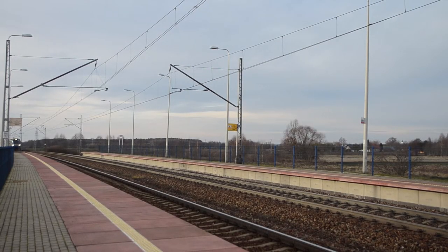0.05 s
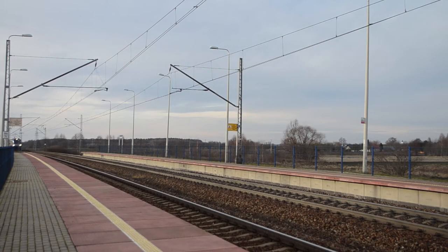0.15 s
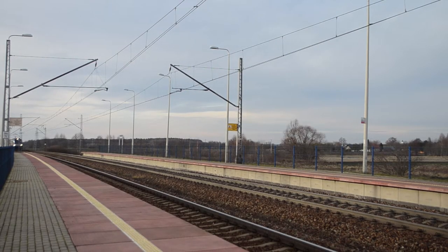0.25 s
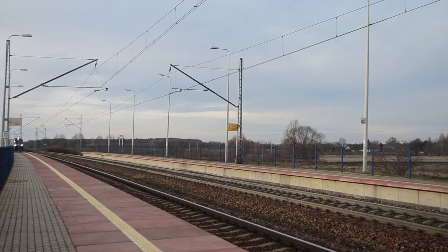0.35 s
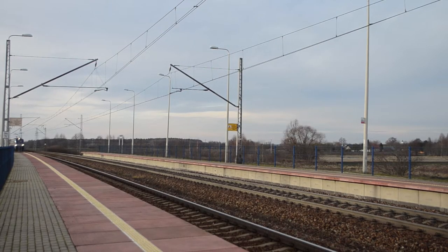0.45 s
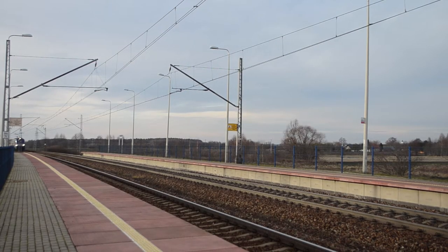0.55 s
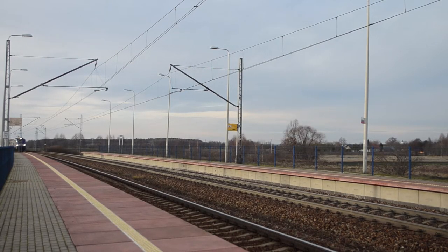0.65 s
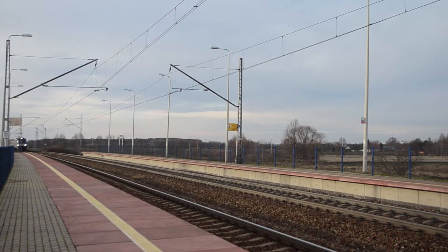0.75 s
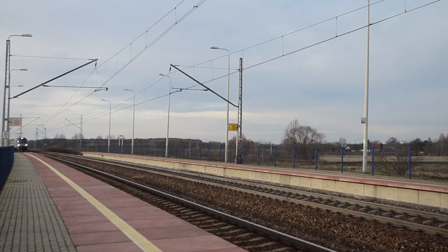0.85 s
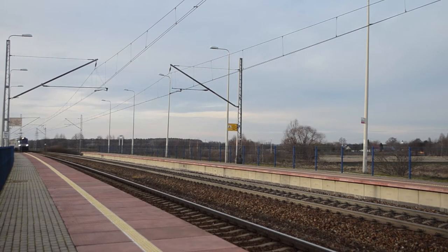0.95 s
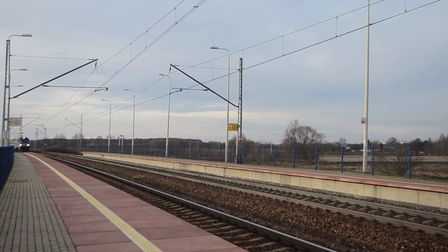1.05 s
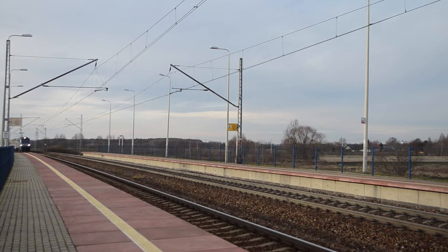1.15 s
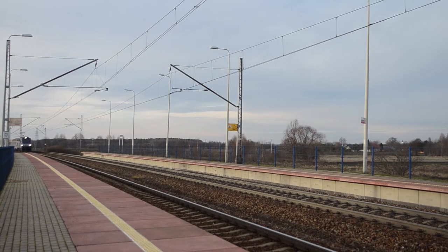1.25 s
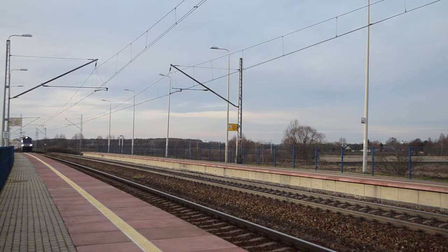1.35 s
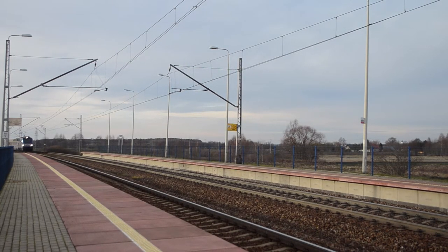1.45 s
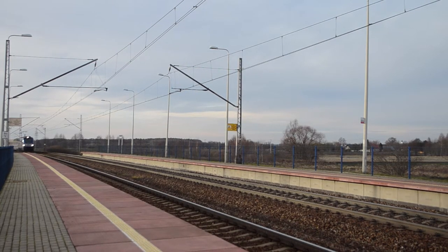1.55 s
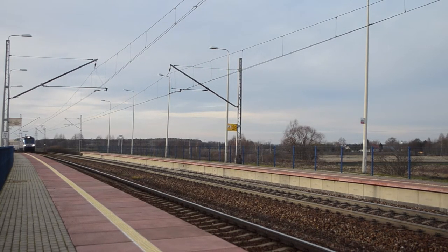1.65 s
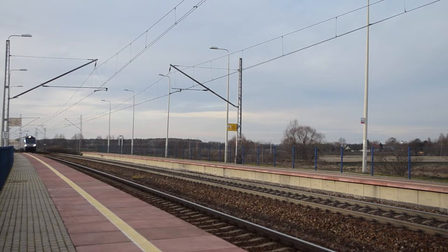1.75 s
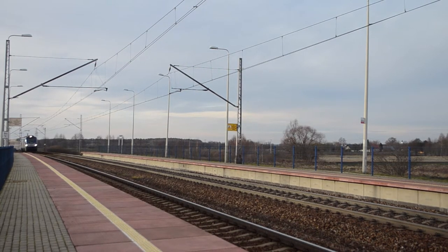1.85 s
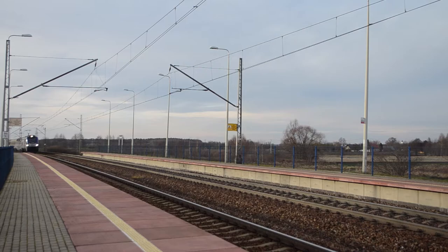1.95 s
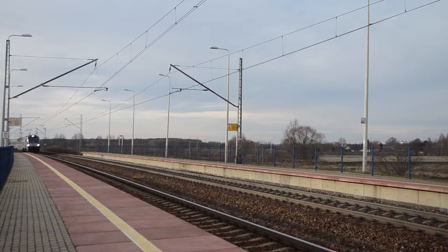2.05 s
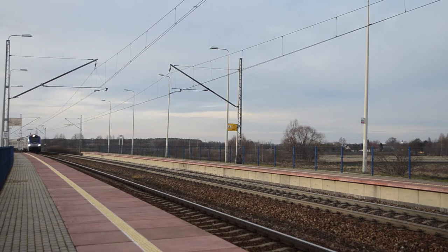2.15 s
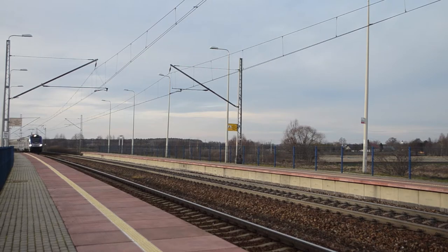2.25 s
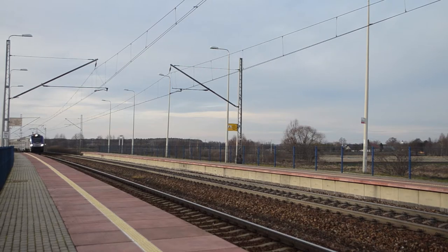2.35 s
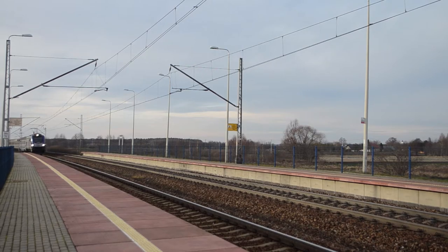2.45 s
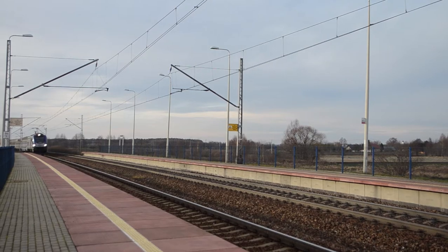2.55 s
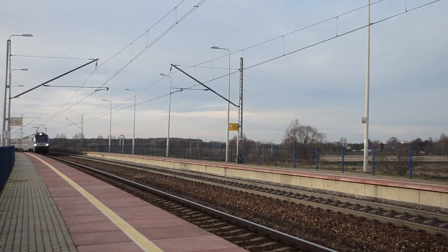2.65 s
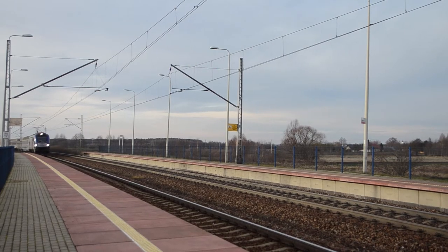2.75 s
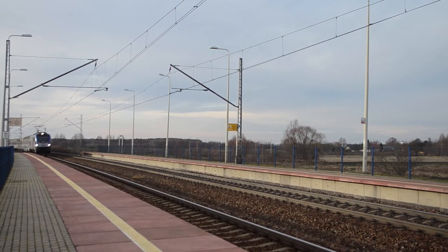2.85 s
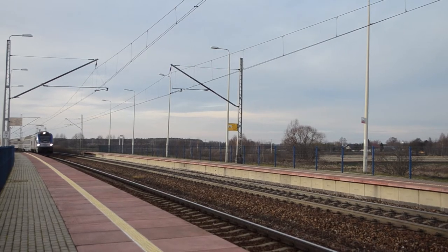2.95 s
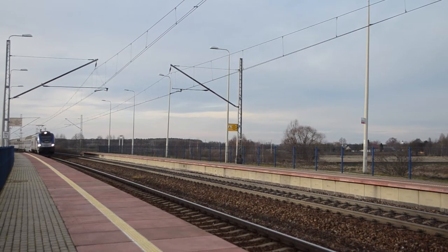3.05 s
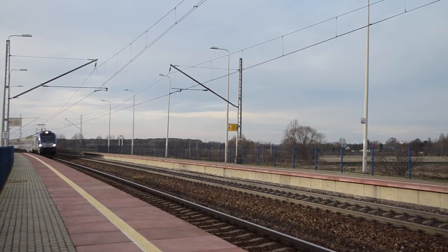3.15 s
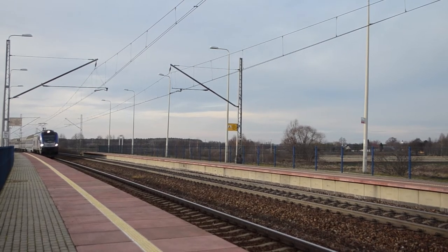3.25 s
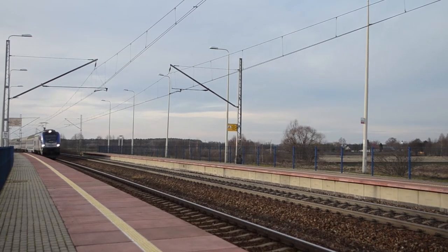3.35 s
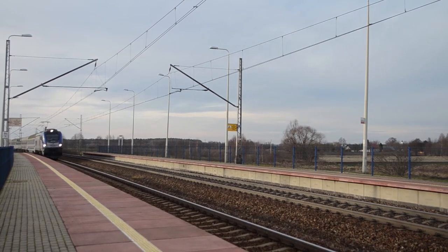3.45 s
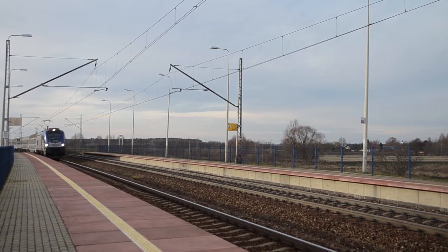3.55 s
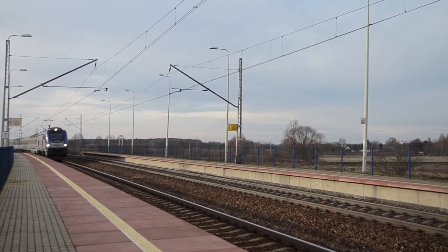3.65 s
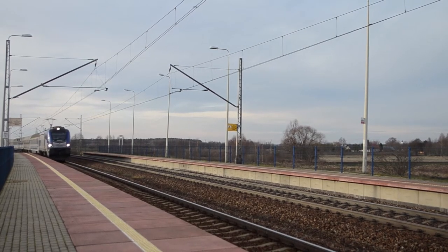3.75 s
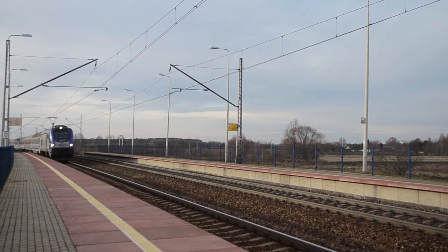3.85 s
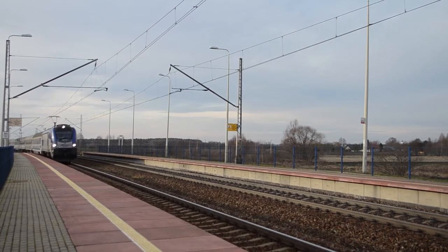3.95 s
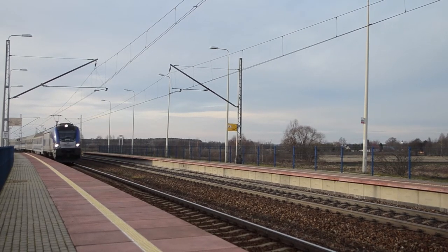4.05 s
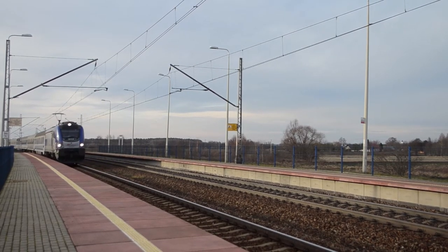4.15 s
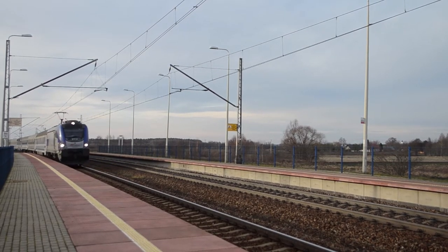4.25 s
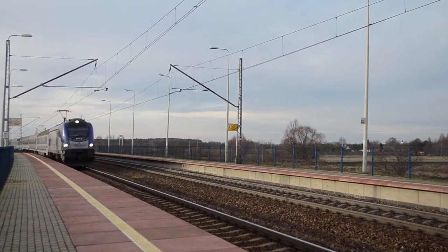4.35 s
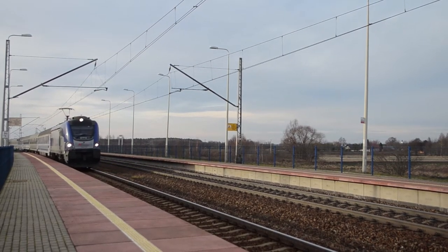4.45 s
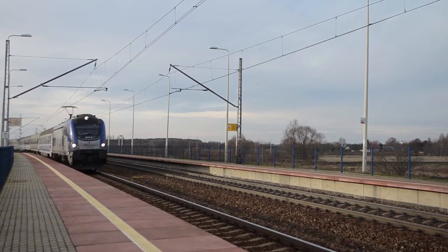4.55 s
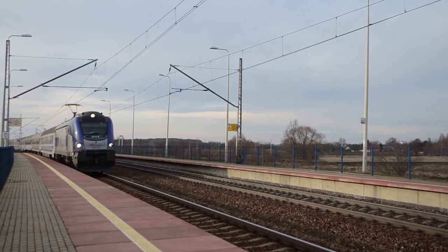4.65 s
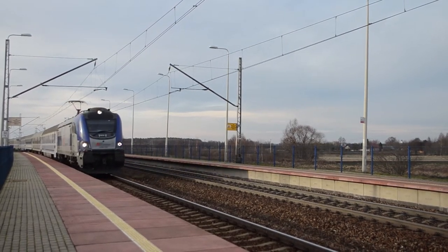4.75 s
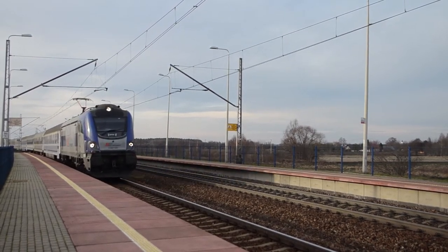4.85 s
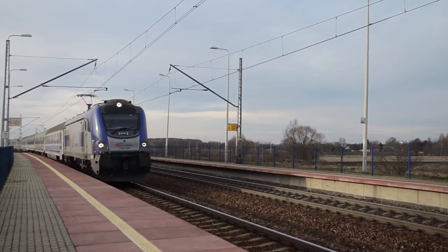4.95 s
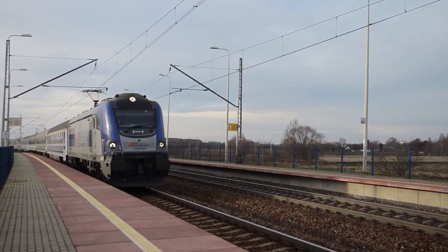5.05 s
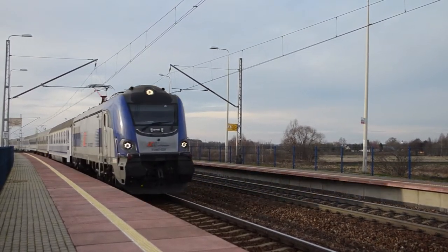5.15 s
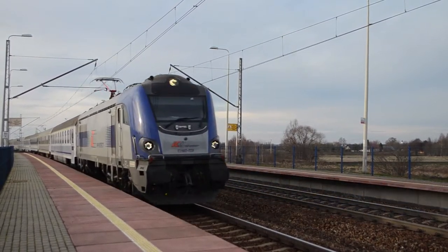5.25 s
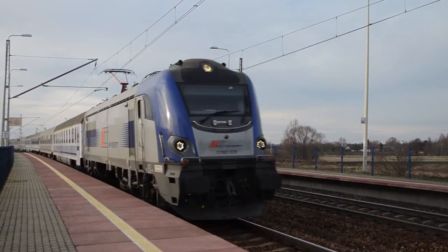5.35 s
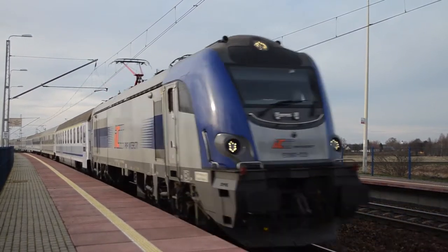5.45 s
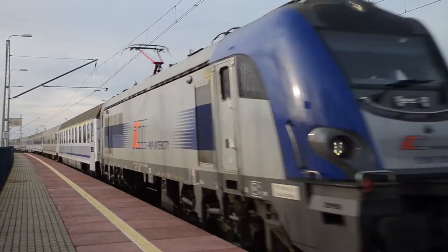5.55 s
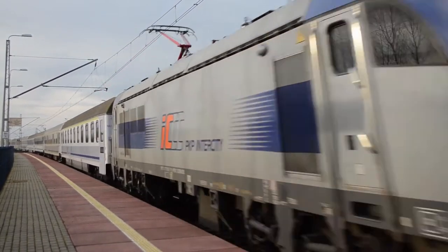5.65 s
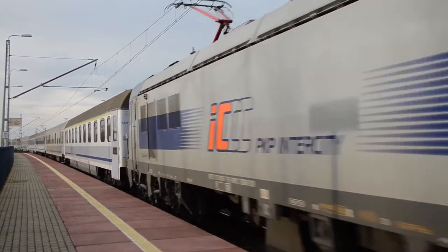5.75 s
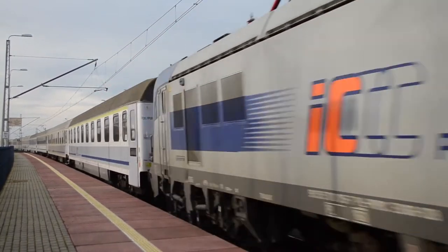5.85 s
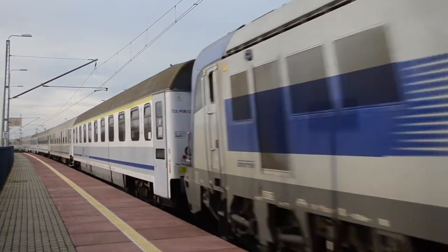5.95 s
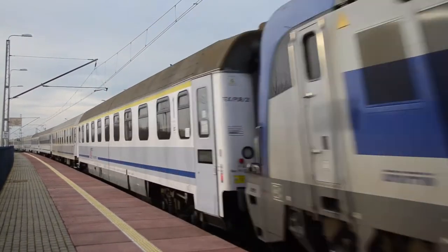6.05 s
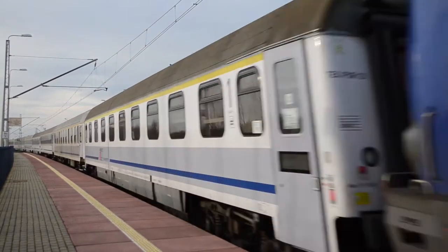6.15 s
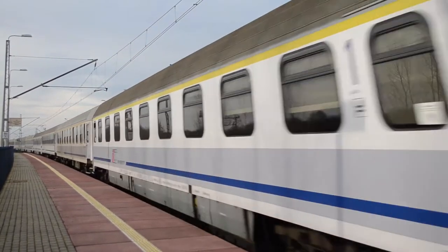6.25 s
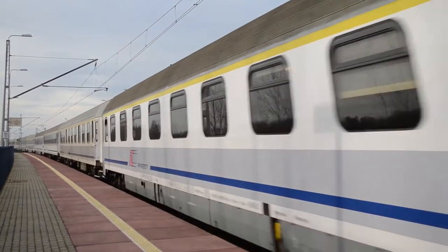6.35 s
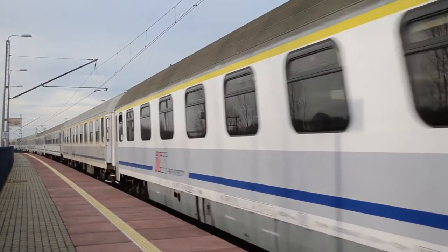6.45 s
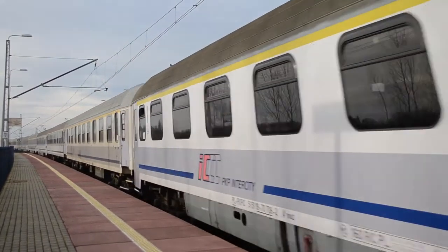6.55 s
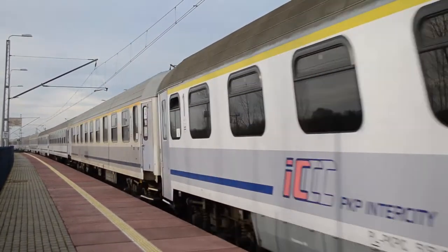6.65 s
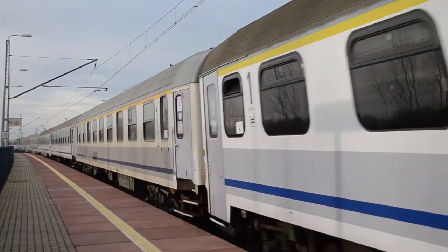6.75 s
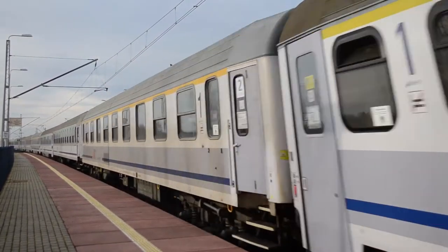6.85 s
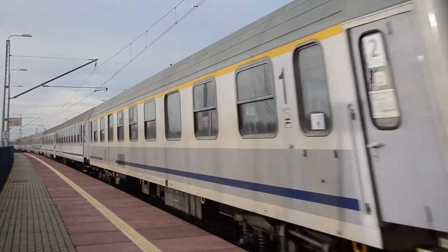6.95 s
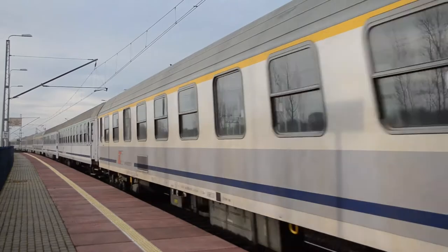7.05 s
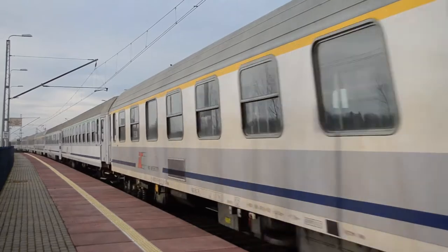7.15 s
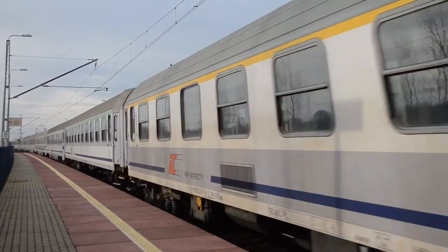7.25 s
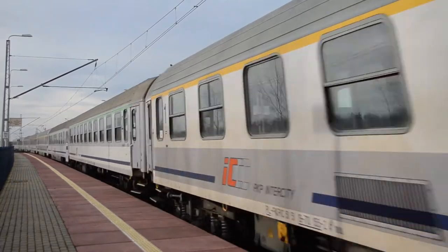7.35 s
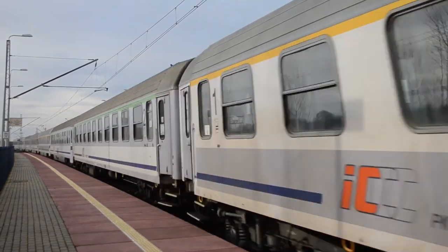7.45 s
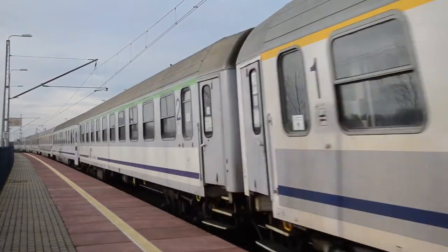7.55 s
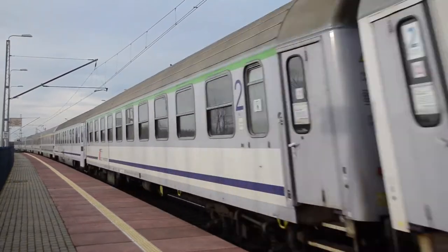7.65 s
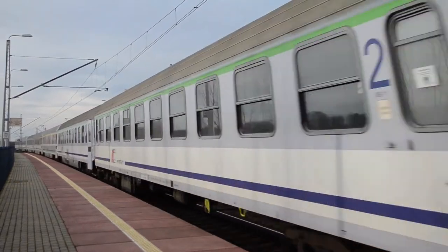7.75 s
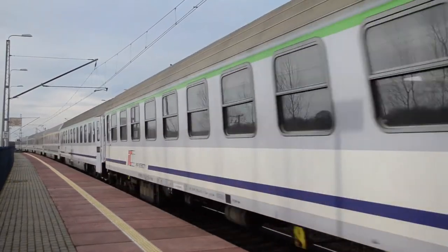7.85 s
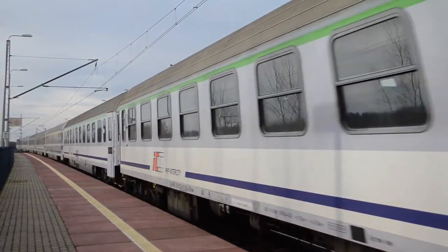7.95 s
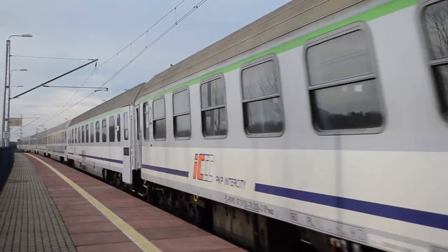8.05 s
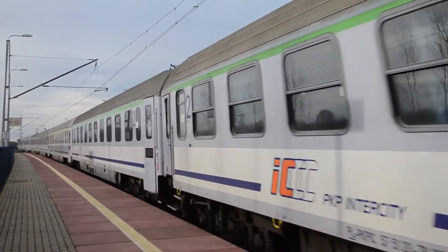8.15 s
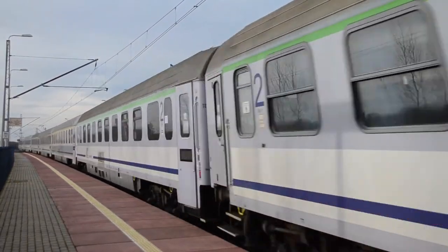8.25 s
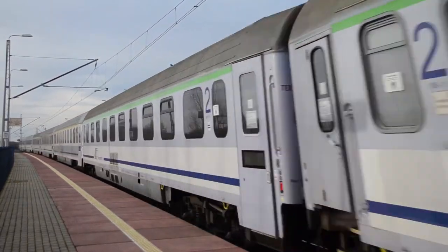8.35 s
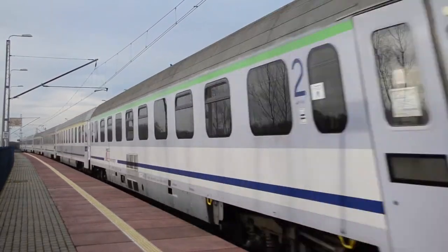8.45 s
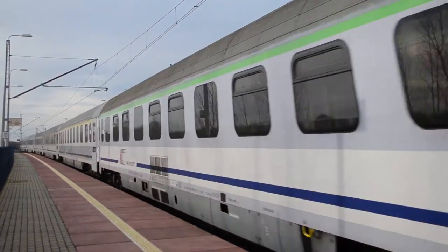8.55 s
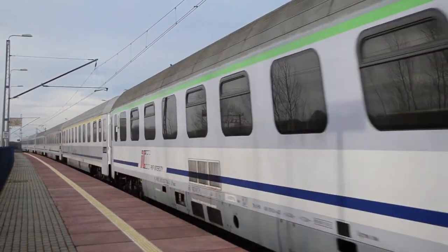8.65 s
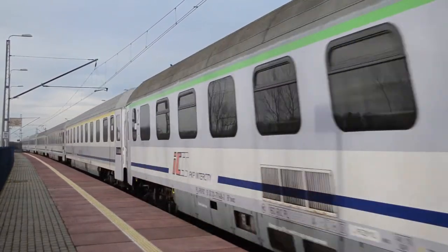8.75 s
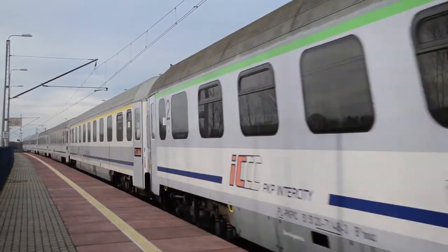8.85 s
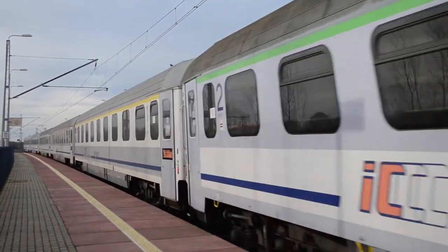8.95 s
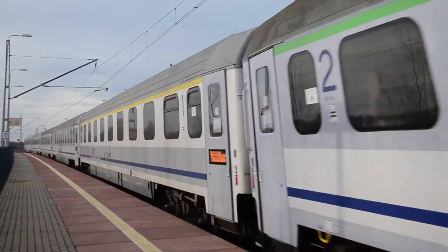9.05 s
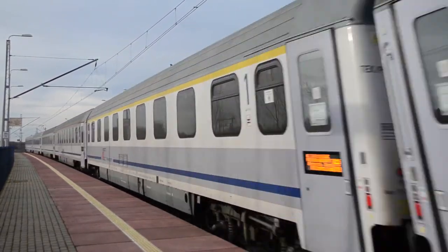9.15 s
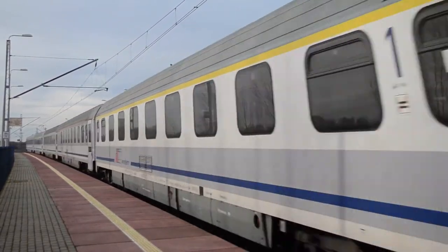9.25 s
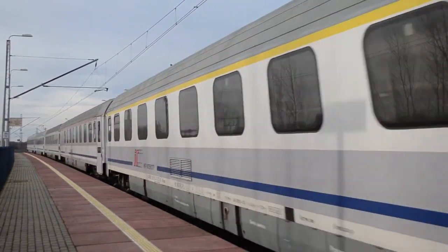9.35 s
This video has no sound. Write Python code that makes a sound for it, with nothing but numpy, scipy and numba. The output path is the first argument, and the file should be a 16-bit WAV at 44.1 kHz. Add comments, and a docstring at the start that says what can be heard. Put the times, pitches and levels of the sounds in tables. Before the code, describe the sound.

Open-air platform with a soft, steady wash of far roads. Thin, high metallic rail singing slowly grows ahead of a train. Around five seconds the sound surges; an electric locomotive roars past close to the microphone, humming and whining tones sliding down in pitch. Carriages follow in loud, quick pulses of rolling noise, gritty rush and falling wheel whines, still passing at the end.

```python
"""An electric express streams past a camera on an open platform, over a steady wash from far roads.
At first the rails sing ahead of it, as noise rung in clusters of high modes.
The locomotive then rumbles by, its drive tones falling in pitch by the Doppler effect.
Bogie after bogie follows with a falling whine, over shaped noise for rush, rumble, rolling and hiss.
The camera's limiter holds the loudest part down."""
import sys
import numpy as np
from scipy import signal
from scipy.fft import rfft, irfft, next_fast_len
from scipy.io import wavfile
from scipy.ndimage import uniform_filter1d, minimum_filter1d
from numba import njit

SR = 44100
rng = np.random.default_rng(int(sys.argv[2]) if len(sys.argv) > 2 else 0)


def wrap_up_sound(samples):
    """Save the sound to the file named by the first command line argument, as 16-bit audio."""
    columns = np.atleast_2d(samples).T
    # keep every value between -1 and 1, then stretch to whole-number steps
    tamed = np.clip(columns, -1, 1)
    steps = np.round(tamed * 32767).astype(np.int16)
    wavfile.write(sys.argv[1], SR, steps)


N = 414099

SPEED_M_S, SOUND_M_S = 35.7, 343
TRACK_M = 8.2  # closest distance of a source from the camera


def undb(db):
    """Amplitude ratio: 20 dB is a factor of ten."""
    return 10 ** (np.asarray(db) / 20)


def unit(x):
    """Normalisation to an rms of 1."""
    return x / np.sqrt(np.mean(x ** 2))


def columns(table):
    """Linear interpolation of each column against the first, time in seconds."""
    time_s, *rest = np.transpose(table)
    return [np.interp(np.arange(N) / SR, time_s, column) for column in rest]


def coloured(x, shape):
    """Spectral shaping: weights x by dB points joined over log frequency; rms 1."""
    hz, db = np.transpose(shape)
    size = next_fast_len(N)
    bins_hz = np.arange(size // 2 + 1) * SR / size + 1  # 1 Hz up, to keep the logarithm finite
    gain = undb(np.interp(np.log(bins_hz), np.log(hz), db))
    return unit(irfft(rfft(x, size) * gain, size)[:N])


def walk(rate_hz):
    """Slow random modulation: levels drawn at rate_hz and smoothed twice; rms 1."""
    hold = int(SR / rate_hz)
    steps = np.repeat(rng.standard_normal(N // hold + 1), hold)
    return unit(uniform_filter1d(uniform_filter1d(steps, hold), hold)[:N])


@njit
def svf(x, hz, width):
    """State-variable resonator: a band-pass with a moving centre, where its gain is 1."""
    y, band, low = np.empty(len(x)), 0., 0.
    for i in range(len(x)):
        g = np.tan(np.pi * hz[i] / SR)
        damping = width / hz[i]
        v = (band + g * (x[i] - low)) / (1 + g * (g + damping))
        band = 2 * v - band
        low = low + 2 * g * v
        y[i] = damping * v
    return y


@njit
def follow(x, attack, release):
    """Peak detection by an exponential approach with separate rates up and down."""
    y, level = np.empty(len(x)), 0.
    for i in range(len(x)):
        rate = attack if abs(x[i]) > level else release
        level += (abs(x[i]) - level) * rate
        y[i] = level
    return y


def ring(hz, width):
    """Resonance excited by noise: two band-passes in series, the second twice as wide; rms 1."""
    once = svf(rng.standard_normal(N), hz, 1. * width)
    return unit(svf(once, hz, 2. * width))


def passing(abreast_s):
    """Doppler effect on a straight path: metres past the camera, distance and pitch factor."""
    along = SPEED_M_S * (np.arange(N) / SR - abreast_s)
    far = np.hypot(along, TRACK_M)
    return along, far, 1 / (1 + SPEED_M_S / SOUND_M_S * along / far)


def blend(before, after, s, spread_s):
    """Constant-power crossfade of two independent noises around s."""
    turn = np.pi / 4 * (1 + np.tanh((np.arange(N) / SR - s) / spread_s))
    return before * np.cos(turn) + after * np.sin(turn)


def distant_roads():
    """Diffuse field: far roads across the fields merge into a steady noise of fixed spectrum."""
    # Spectral density: freq_hz, relative_db
    roads_spectrum = [(12, -49), (20, -15), (27, -5.5), (101, -5.5), (295, -27), (389, -5), (620, -13),
                      (673, -9.5), (862, 1.5), (1170, -7.5), (1340, -4), (1760, -4), (2590, -29),
                      (4240, -46), (14200, -59)]
    return coloured(rng.standard_normal(N), roads_spectrum) * undb(-42.5 + .5 * walk(4.0))


def rails():
    """Modal ringing: the wheels excite clusters of high rail modes unevenly from far ahead."""
    # Rail modes: pitch_hz, width_hz (ahead of a broadening by 1.4), relative_db
    rail_modes = [(4650, 150, -7), (5400, 60, -8), (5580, 50, -10), (5660, 50, -3.5), (5800, 50, -9),
                  (6900, 50, -15), (6870, 50, -1), (7100, 50, 0.5), (7300, 70, -3), (7350, 60, -10.5),
                  (7500, 60, -8), (8560, 60, -20), (8900, 80, -14), (9150, 50, -3.5), (9370, 60, -2),
                  (9500, 60, 1.5), (9640, 40, -5), (10300, 60, -14.5), (10750, 120, -10), (11200, 80, -16)]
    # Common gain of the modes: time_s, gain_db
    rail_song = [(0, -85), (1, -84.5), (2, -80.5), (3, -78), (3.6, -75), (4.3, -72), (4.8, -75), (5.3, -70),
                 (5.8, -86)]
    song_db, = columns(rail_song)
    modes = 0
    for hz, width, db in rail_modes:
        uneven_db = db + 1.5 * walk(20)
        modes = modes + ring(np.full(N, 1. * hz), 1.4 * width) * undb(uneven_db)
    return undb(song_db) * modes


def locomotive(steady=1.1, waver_hz=4.95):
    """Doppler-shifted drive tones: narrow noises, with a steady core in the gear whine."""
    # Levels of the tones' noise: time_s, gear_whine_db, blower_db, hum_db
    drive_levels = [(0, -77, -69, -68), (3, -61, -60, -56.5), (4.6, -51.5, -40.5, -42.5),
                    (5.2, -40, -42, -38), (5.27, -30, -36, -29.5), (5.45, -31.5, -28.5, -33),
                    (5.6, -36, -30.5, -25.5), (5.74, -44, -22, -20), (5.83, -21.5, -25, -28.5),
                    (6.0, -25, -19, -25), (6.15, -21.5, -13, -29), (6.3, -25, -16, -30),
                    (6.42, -36, -26, -39), (6.6, -31, -28, -46), (6.75, -31, -40, -47),
                    (7.2, -57, -60, -60)]
    # Gear whine, blower and hum: abreast_s, rest_pitch_hz, width_hz
    drive_tones = [(6.28, 1662, 28), (6.27, 835, 60), (6.9, 183, 24)]
    # Further drive tones that rise and fall with the hum: rest_pitch_hz, width_hz, level_against_hum_db
    further_tones = [(245, 26, -5.5), (585, 39, -2)]
    gear_db, _, hum_db = columns(drive_levels)

    tones = 0
    for (abreast_s, hz, width), db in zip(drive_tones, columns(drive_levels)):
        tones = tones + ring(hz * passing(abreast_s)[2], width) * undb(db)

    gear_abreast_s, gear_hz, _ = drive_tones[0]
    core_hz = gear_hz * passing(gear_abreast_s)[2] + waver_hz * walk(30)
    core = np.sqrt(2) * np.sin(2 * np.pi * np.cumsum(core_hz) / SR)  # rms 1

    hum_doppler = passing(drive_tones[-1][0])[2]
    further = sum(ring(hz * hum_doppler, width) * undb(db) for hz, width, db in further_tones)
    return tones + steady * core * undb(gear_db) + further * undb(hum_db)


def whines(patchy_db=2.0):
    """Doppler-shifted resonances: a bogie's two axles pass in turn, slightly apart in pitch."""
    # Bogie whines: abreast_s, rest_pitch_hz (between the axles), width_hz, axle_level_abreast_db
    bogie_whines = [(6.36, 1614, 70, -21), (6.54, 1640, 60, -20), (7.16, 1615, 80, -18),
                    (7.15, 2210, 350, -28), (7.26, 1682, 70, -26), (7.8, 1658, 80, -19.5),
                    (7.76, 2200, 200, -29), (8.0, 1476, 120, -25.5), (8.4, 1596, 90, -18),
                    (8.5, 2160, 200, -32), (8.65, 1615, 100, -23.5), (8.9, 1560, 100, -26.5),
                    (9.15, 1650, 89, -25.5), (9.25, 2290, 190, -31.5), (9.4, 1614, 70, -19.5)]
    axles_m = 2.5
    out = 0
    for abreast_s, hz, width, db in bogie_whines:
        for axle in (-.5, .5):
            along, far, doppler = passing(abreast_s + axle * axles_m / SPEED_M_S)
            # powers of distance ahead of the camera and behind it
            fade = (TRACK_M / far) ** np.where(along < 0, 1.7, 1.97)
            tone = ring(hz * (1 + 0.03 * axle) * doppler, width)
            out = out + tone * undb(db + patchy_db * walk(32)) * fade
    return out


def loudness():
    """Incoherent addition: the bogies' powers add, each faded by its distance."""
    # Running gear, nose first: abreast_s, rush_db, rumble_db, rolling_db, hiss_db (when abreast)
    bogies = [(5.66, -30.5, -17.5, -20, -47.5), (6.03, -27, -25.5, -19, -48.5),
              (6.32, -24.5, -32, -19, -52), (6.86, -25.5, -34, -20, -50.5), (7.1, -23.5, -29.5, -14, -49.5),
              (7.63, -26, -32, -17.5, -52), (7.85, -27, -32, -16.5, -50), (8.33, -24, -36, -19, -49),
              (8.62, -24.5, -29.5, -15.5, -50), (9.1, -21.5, -28, -17.5, -43.5),
              (9.34, -22, -31.5, -13.5, -50)]
    # Powers of distance for rush, rumble, rolling and hiss, ahead of the camera and behind it
    fade_ahead = [1.72, 1.29, 1.307, 1.9]
    fade_behind = [1.67, 1.48, 1.43, 2.2]
    # The approaching nose, same four noises: powers of distance, and ground losses in dB per metre
    nose_fade = [0.48, 0.84, 0.79, 0.49]
    nose_loss_db_m = [0.18, 0.089, 0.12, 0.13]
    power = 0
    for k, (abreast_s, *db) in enumerate(bogies):
        along, far, _ = passing(abreast_s)
        gain = (TRACK_M / far) ** np.where(along < 0, np.c_[fade_ahead], np.c_[fade_behind])
        if k == 0:
            ground = undb(-np.c_[nose_loss_db_m] * (far - TRACK_M))
            approach = (TRACK_M / far) ** np.c_[nose_fade] * ground
            gain = np.where(along < 0, approach, gain)
        power = power + (undb(np.c_[db]) * gain) ** 2
    return np.sqrt(power)


def train():
    """Broadband noise: rumble, and gritty rush, rolling and hiss with a slight random flutter in level."""
    # Spectral densities, each: freq_hz, relative_db
    loco_spectrum = [(12, -53), (20, -24), (109, -5), (172, -1.5), (203, -3), (282, -5), (307, -7),
                     (392, -3), (600, -6), (780, -53), (1320, -120)]
    coach_spectrum = [(12, -56), (20, -31.5), (118, -8), (155, -8), (201, -2.5), (297, -5.5), (329, -6),
                      (450, -2), (580, -34), (990, -120)]
    rolling_spectrum = [(180, -41), (300, -10.5), (347, -23.5), (442, -7.5), (511, -6.5), (624, -2.5),
                        (1240, -2.5), (1600, -3.5), (2600, -19), (3380, -36), (5720, -120)]
    rush_spectrum = [(1180, -34.5), (2000, -2), (2370, -9), (2640, -9.5), (7000, -37), (9100, -51),
                     (15400, -120)]
    near_spectrum = [(3240, -14), (5500, -8.5), (6570, -7.5), (11900, -12), (15600, -29)]
    far_spectrum = [(5000, -20), (6200, -6), (8000, -6), (9800, -4), (11000, -3), (13000, -8), (14300, -9),
                    (15700, -18)]

    loco = coloured(rng.standard_normal(N), loco_spectrum)
    coach = coloured(rng.standard_normal(N), coach_spectrum) * undb(1.5 * walk(8.3))
    rumble = blend(loco, coach, 6.36, 0.14)
    rolling = coloured(rng.standard_normal(N), rolling_spectrum)

    # grit: sample sizes spread exponentially in dB
    rush_grit = rng.standard_normal(N) * undb(2.1 * rng.exponential(size=N))
    near_grit = rng.standard_normal(N) * undb(1.9 * rng.exponential(size=N))
    rush = coloured(rush_grit, rush_spectrum)
    # from afar the hiss is thin and high; alongside it fills in below
    far_hiss = coloured(rng.standard_normal(N), far_spectrum) * undb(-4.5)
    hiss = blend(far_hiss, coloured(near_grit, near_spectrum), 4.86, .35)

    flutter = walk(16)  # shared, at its own depth in dB for each noise
    noises = [rush * undb(.55 * flutter), rumble,
              rolling * undb(0.51 * flutter), hiss * undb(0.76 * flutter)]
    return np.sum(noises * loudness(), axis=0)


def scene():
    """Superposition of roads, rails, locomotive, whines and running gear in one channel."""
    return (distant_roads() + rails() + locomotive() + whines() + train())[None]


def record(dry, top_db=-3.0, release_s=0.13):
    """Gain reduction by a look-ahead limiter, after a faint camera whistle and ahead of a top cut."""
    whistle_hz, whistle_db, top_hz = 15687, -78.5, 15720
    whistle = np.sqrt(2) * undb(whistle_db) * np.sin(2 * np.pi * whistle_hz * np.arange(N) / SR)
    x = dry[0] + whistle
    ratio, attack_s = 5.0, .0006
    # the largest sample within 64 on either side lets the gain fall ahead of a peak
    ahead = -minimum_filter1d(-np.abs(x), size=129)
    peak = follow(ahead, 1 / (attack_s * SR), 1 / (release_s * SR))
    x = x * np.minimum(1, undb(top_db) / (peak + 1e-9)) ** (1 - 1 / ratio)
    top_cut = signal.ellip(14, .2, 70, top_hz, fs=SR, output="sos")
    return signal.sosfilt(top_cut, x)[None]


dry = scene()
out = record(dry)
wrap_up_sound(out)
```